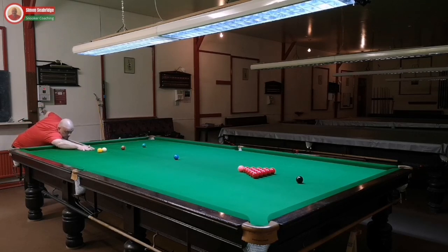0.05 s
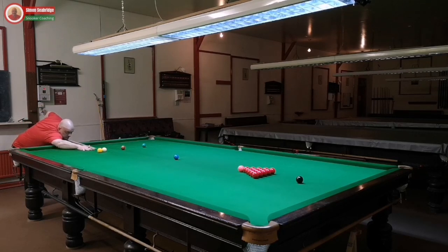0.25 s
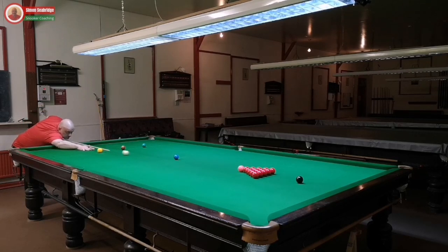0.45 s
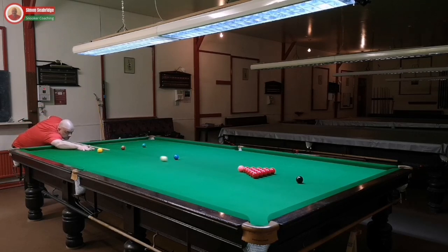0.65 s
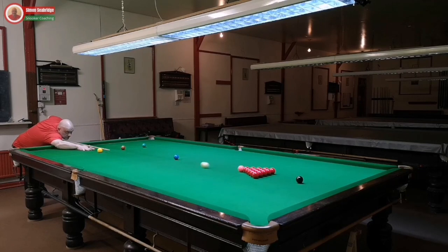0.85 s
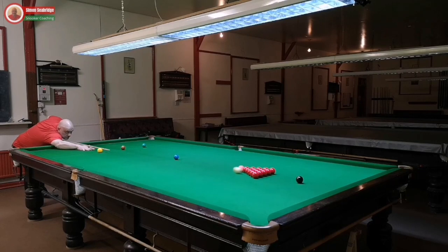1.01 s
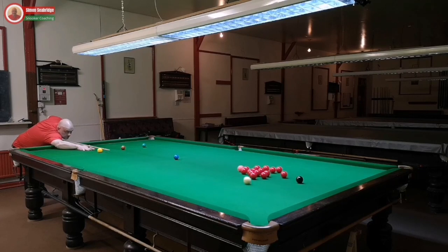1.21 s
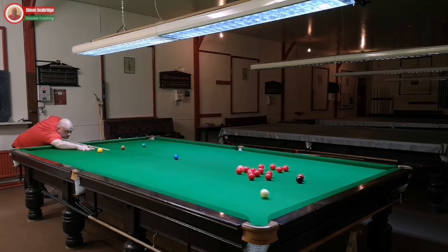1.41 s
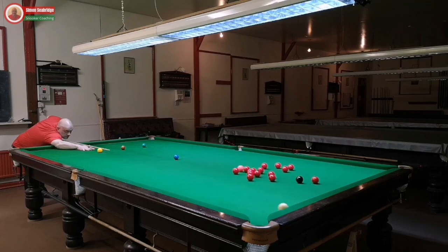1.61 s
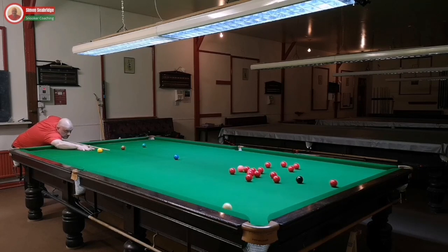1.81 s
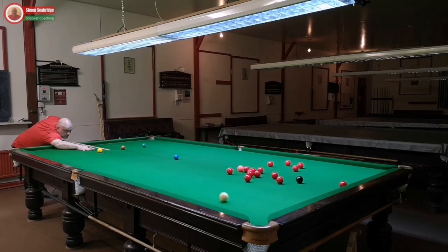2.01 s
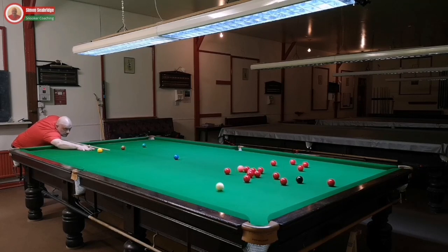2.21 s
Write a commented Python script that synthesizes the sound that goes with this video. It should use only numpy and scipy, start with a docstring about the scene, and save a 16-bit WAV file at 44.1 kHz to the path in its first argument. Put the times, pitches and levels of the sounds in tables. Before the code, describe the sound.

A snooker break: a wooden cue slides briefly over a hand and cracks against the ball, close by. The ball clacks into the pack, echoing through a quiet hall, then faint rolling and two soft cushion thuds follow.

```python
"""A quiet snooker hall, at the break. Close by, the cue slides over the player's hand, cracks against
the white ball, rings as its wood bends, rattles and is pulled up. The white clacks into the pack of
reds and the hall rings. The balls roll with a faint rumble, and two thud softly into the rubber
cushions. Under it all lie the low rush of the room and a thin hiss."""
import sys
import numpy as np
from scipy import signal
from scipy.fft import rfft, irfft
from scipy.io import wavfile
from scipy.ndimage import uniform_filter1d, minimum_filter1d

SR = 44100
rng = np.random.default_rng(int(sys.argv[2]) if len(sys.argv) > 2 else 0)


def put_to_file(sound):
    """Save the sound as 16-bit audio at rate SR, in the file named by the first command-line argument."""
    columns = np.atleast_2d(sound).T  # one column per channel
    safe = np.clip(columns, -1, 1)
    whole_steps = np.round(safe * 32767)
    wavfile.write(sys.argv[1], SR, whole_steps.astype(np.int16))


N = 103635
T = np.arange(N) / SR
HZ = np.fft.rfftfreq(N, 1 / SR)
STRIKE_S = 0.2429

# The notes of the bending cue; a fade is the time to drop by 60 dB (f/Hz, level/dB, fade/s)
CUE_NOTES = [(37, -41.5, 0.49), (104.6, -23.5, .15), (205, -22.5, 0.13), (332.4, -25.5, 0.13),
             (687, -24.5, .085), (915, -7.5, 0.055), (1168, -12.5, 0.062), (1424, -20.5, 0.11),
             (1775, -19.5, 0.073), (2046, -22, .055), (2360, -20, 0.038), (2775, -16, 0.03),
             (3082, -12, 0.024), (3222, -19.5, 0.038), (4080, -24, 0.011)]
# The tip's crack; a colour says how strong a noise is at each pitch (f/Hz, level/dB)
CRACK_COLOUR = [(100, -16), (260, 5), (550, 4), (1000, -3), (1600, -8.5), (2100, 2.5), (2600, -2.5),
                (3500, 1.5), (4200, -5), (5100, -28), (6700, -23.5), (8500, -28), (11000, -46),
                (15000, -40.5)]
# Each rattle of the shaft after the blow (t/s, level/dB)
RATTLES = [(0.2517, -25), (0.2559, -41), (0.2622, -36)]
# The colour of a rattle (f/Hz, level/dB)
RATTLE_COLOUR = [(300, -12), (1500, -0.5), (3000, -1.5), (5000, -0.5), (6500, -8), (8200, -11.5),
                 (11000, -29), (14000, -25)]
def cue_strike():
    """The tip cracks against the ball; the wooden shaft bends to and fro, ringing, then rattles."""
    age = np.maximum(T - STRIKE_S, 0)
    contact_s = 0.0011  # the ring builds while the tip presses on the ball
    swell = np.sin(np.pi / 2 * np.minimum(age / contact_s, 1)) ** 2
    ring = sum((-1) ** k * amp(db) * fade_out(age, fade) * np.sin(2 * np.pi * hz * age)
               for k, (hz, db, fade) in enumerate(CUE_NOTES, 1))  # every other note is flipped
    crack = amp(-15) * noise(CRACK_COLOUR) * burst(STRIKE_S, rise=0.00089, hold=0.0024, fade=0.022)
    shakes = sum(amp(db) * burst(s, rise=0.0011, hold=0.0011, fade=0.0063) for s, db in RATTLES)
    return swell * ring + crack + noise(RATTLE_COLOUR) * shakes


def clack(start, pitch_hz=2760, crest_s=0.0005):
    """Two hard balls meet: a few quick waves swell and die within two milliseconds."""
    age = np.maximum(T - start, 0)
    swell = (age / crest_s * np.exp(1 - age / crest_s)) ** 2.5
    return swell * np.sin(2 * np.pi * pitch_hz * age)


# Ball against ball, and the nearest echoes (t/s, level/dB)
CLACKS = [(0.9692, -16), (0.973, -35), (0.9735, -27.5), (0.9866, -28), (.9900, -28), (1.0132, -37),
          (1.0247, -45), (1.075, -40)]
# The colour of the knock under the first clack (f/Hz, level/dB)
KNOCK_COLOUR = [(150, -20), (400, -14.5), (1000, -9), (1550, -7), (2200, 5), (4400, -9), (6000, -45),
                (9000, -62)]
# The colour of the hall's answer to the clacks (f/Hz, level/dB)
PACK_ECHO_COLOUR = [(120, -40.5), (250, -21.5), (500, -11), (800, -6), (1200, -3), (1550, 2), (2100, -1.5),
                    (2900, -2.5), (3800, -15.5), (4600, -20.5), (5500, -46.5), (8000, -56)]
# How long that answer lasts at each pitch (f/Hz, fade/s)
PACK_ECHO_FADES = [(300, 0.72), (800, 0.98), (1600, 0.91), (3000, 0.72), (5000, 0.46)]
def pack_hit():
    """The white knocks into the reds; the hall smears the clacks into a long, bright echo."""
    first = CLACKS[0][0]
    clacks = sum(amp(db) * clack(s) for s, db in CLACKS)
    knock = amp(-34) * noise(KNOCK_COLOUR) * burst(first, rise=0.0005, hold=0, fade=0.028)
    echo = die_away(noise(PACK_ECHO_COLOUR), start=first + 0.059, fades=PACK_ECHO_FADES)
    return clacks + knock + amp(-40) * echo * fade_in(first, rise=0.003)


# Each rub of the shaft over the hand (t/s, hold/s, level/dB, fade/s)
SLIDES = [(0.16, .012, -62, 0.13), (0.195, 0.0092, -43.5, 0.1), (0.223, .02, -55, .05),
          (0.267, 0.012, -51.5, 0.037), (0.336, 0.009, -52.5, 0.25)]
# The colour of wood rubbing on skin (f/Hz, level/dB)
SLIDE_COLOUR = [(100, -17), (300, 3), (550, -2.5), (850, -10.5), (1300, 0.5), (1900, -1.5), (3000, 2),
                (5000, -5), (7800, -3.5), (9500, -15.5), (11000, -34), (13000, -17), (16000, -19)]
# Dull bumps as the cue is pushed and pulled up, timed at their peaks (t/s, f/Hz, width/s, level/dB)
BUMPS = [(0.2081, 51, 0.011, -29.5), (0.2526, 100, 0.0068, -20.5), (0.3442, 88, 0.0056, -28.5),
         (0.487, 42, 0.015, -46)]
# The colour of the stroke's low shudder (f/Hz, level/dB)
SHUDDER_COLOUR = [(8, -10), (20, -3), (42, 5), (70, -13), (130, -20.5), (300, -74), (1000, -100)]
# How that shudder swells and sinks (t/s, level/dB)
SHUDDER_LEVELS = [(.16, -74), (.21, -35.5), (.34, -37.5), (.42, -46), (.49, -53), (.56, -64), (.7, -71)]
def cue_stroke():
    """Wood hisses over the hand; the push and the stop give low bumps and a shudder."""
    rubs = sum(amp(db) * burst(s, rise=0.01, hold=hold, fade=fade) for s, hold, db, fade in SLIDES)
    slide = noise(SLIDE_COLOUR) * rubs
    bumps = sum(amp(db) * np.exp(-((T - s) / width) ** 2) * np.cos(2 * np.pi * hz * (T - s))
                for s, hz, width, db in BUMPS)
    shudder = noise(SHUDDER_COLOUR) * follow(SHUDDER_LEVELS)
    return slide + bumps + shudder


# How long the hall rings at each pitch (f/Hz, fade/s)
HALL_FADES = [(100, 0.42), (400, 1), (1400, 1), (3000, 0.83), (8000, 0.38)]
# How much of the strike the hall sends back (f/Hz, level/dB)
HALL_RETURN = [(60, -25), (200, -26.5), (450, -30), (950, -34), (1600, -25), (3000, -48), (8000, -37.5)]
# The colour of the hall's answer to the cue (f/Hz, level/dB)
CUE_WASH_COLOUR = [(60, -11.5), (150, 1), (450, 0.5), (700, 0), (1000, -2), (1500, -11.5), (2200, -13.5),
                   (3200, -17.5), (5000, -29), (8000, -22), (11000, -42)]
def hall_echo(strike):
    """The hall returns the cue's crack as a soft wash of noise, with a trace of its ring."""
    tail = die_away(rng.standard_normal(N), start=0, fades=HALL_FADES)
    tail /= np.linalg.norm(tail)
    tail = irfft(rfft(tail) * amp(look_up(HALL_RETURN, HZ)), N)[:SR]
    trace = signal.fftconvolve(strike, tail)[:N]  # gives every moment of the strike this tail
    wash = die_away(noise(CUE_WASH_COLOUR), start=STRIKE_S, fades=HALL_FADES)
    return trace + amp(-44.5) * wash * fade_in(STRIKE_S, rise=0.019)


# Each ball that meets a cushion (t/s, hold/s, level/dB)
THUDS = [(1.558, 0.03, -54.5), (1.763, 0.073, -58.5)]
# The colour of a thud (f/Hz, level/dB)
THUD_COLOUR = [(40, -21), (90, -11.5), (140, 0.5), (220, -19), (320, -4), (450, -17.5), (800, -33),
               (2000, -48), (5000, -65)]
def cushion_thuds():
    """Rubber takes the blow and the table's frame rumbles briefly."""
    thuds = sum(amp(db) * burst(s, rise=0.021, hold=hold, fade=0.67) for s, hold, db in THUDS)
    return noise(THUD_COLOUR) * thuds


# The colour of rolling balls (f/Hz, level/dB)
ROLL_COLOUR = [(20, -11.5), (55, 2), (130, -7), (300, -12), (500, -26), (1500, -42), (5000, -85)]
# How the rolling swells and sinks (t/s, level/dB)
ROLL_LEVELS = [(.95, -95), (.98, -62), (1.25, -67.5), (1.45, -79), (1.62, -63.5), (1.85, -71), (2.0, -80),
               (2.35, -84)]
def rolling_balls():
    """The reds rumble faintly over the cloth and the slate beneath it."""
    return noise(ROLL_COLOUR) * follow(ROLL_LEVELS)


# The colour of the quiet room (f/Hz, level/dB)
AIR_COLOUR = [(12, -23), (22, -2), (88, -4), (245, -8.5), (450, -10.5), (800, -12.5), (1500, -15.5),
              (2800, -18.5), (5000, -22.5), (7500, -28), (9000, -33), (10400, -41.5), (11500, -60)]
# The colour of the thin hiss (f/Hz, level/dB)
HISS_COLOUR = [(9000, -41.5), (11100, -20), (11800, -10), (12500, -4.5), (14000, 0), (16000, 3)]
def background():
    """The room's steady low rush, with a faint, very high hiss on top."""
    return amp(-60) * noise(AIR_COLOUR) + amp(-72) * noise(HISS_COLOUR)


def amp(db):
    """Turns decibels into a number to multiply a sound by."""
    return 10 ** (np.asarray(db) / 20)


def look_up(table, hz):
    """Reads a table between its rows, with pitches spaced as on a piano."""
    pitches, values = np.transpose(table)
    return np.interp(np.log(hz + 1), np.log(pitches + 1), values)


def follow(levels):
    """A volume that glides from one listed level to the next."""
    return amp(np.interp(T, *np.transpose(levels)))


def noise(colour):
    """Noise of the given colour, always scaled to the same strength (rms 1)."""
    phases = np.exp(2j * np.pi * rng.random(len(HZ)))
    x = irfft(amp(look_up(colour, HZ)) * phases, N)
    return x / x.std()


def fade_in(start, rise):
    """Climbs evenly from 0 to 1 in `rise` seconds."""
    return np.clip((T - start) / rise, 0, 1)


def fade_out(age, fade):
    """Stays at 1 until age 0, then drops 60 dB every `fade` seconds."""
    return np.exp(-np.log(1000) * np.maximum(age, 0) / fade)


def burst(start, rise, hold, fade):
    """A volume that rises, and begins to fade `hold` seconds after the start."""
    return fade_in(start, rise) * fade_out(T - start - hold, fade)


def die_away(x, start, fades):
    """From the start time on, each pitch fades at its own speed."""
    hz, t, bands = signal.stft(x, SR, nperseg=256)
    bands = bands * fade_out(t - start, look_up(fades, hz)[:, None])
    return signal.istft(bands, SR)[1][:N]


def scene():
    """Cue, balls and cushions over the quiet room, in one channel."""
    strike = cue_strike()
    room = background()
    cue = strike + hall_echo(strike) + cue_stroke()
    balls = pack_hit() + rolling_balls() + cushion_thuds()
    return (cue + balls + room)[None]


def record(dry):
    """Briefly turns down any peak above the ceiling, then cuts the very highest treble."""
    ceiling_db, cutoff_hz = -3.7, 15880
    gain = np.minimum(1, amp(ceiling_db) / (abs(dry) + 1e-9))
    gain = minimum_filter1d(gain, size=89)  # hold each dip for 2 ms
    gain = uniform_filter1d(uniform_filter1d(gain, size=45), size=45)  # round its corners
    treble_cut = signal.firwin(511, cutoff_hz, window=("kaiser", 9), fs=SR)
    return signal.oaconvolve(dry * gain, treble_cut[None], "same")


dry = scene()
out = record(dry)
put_to_file(out)
```